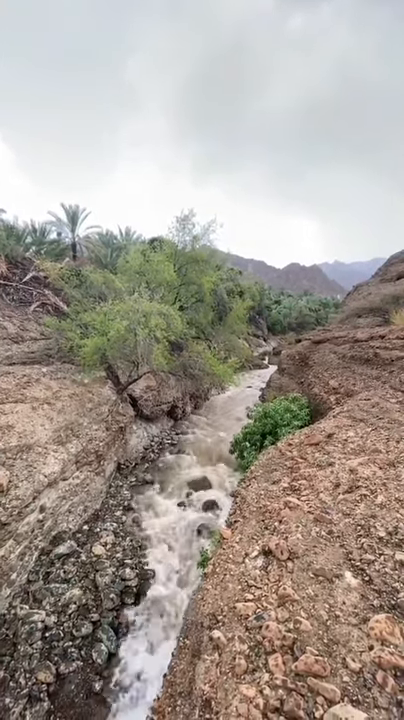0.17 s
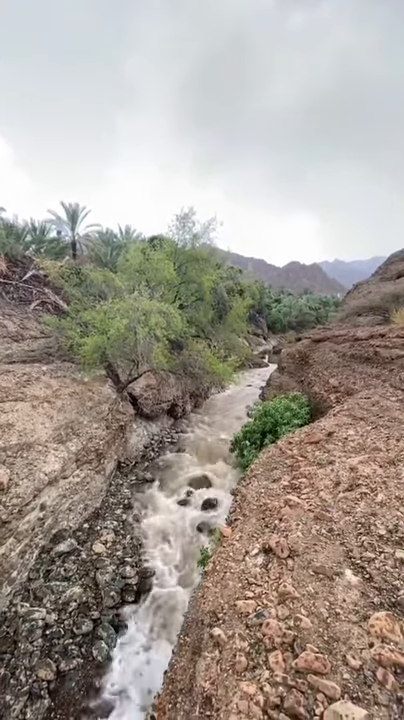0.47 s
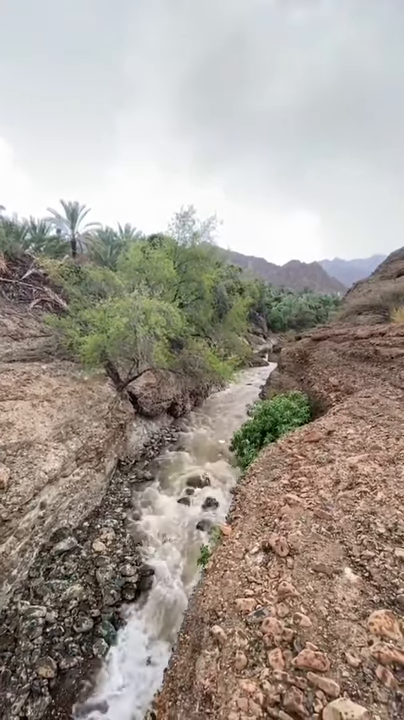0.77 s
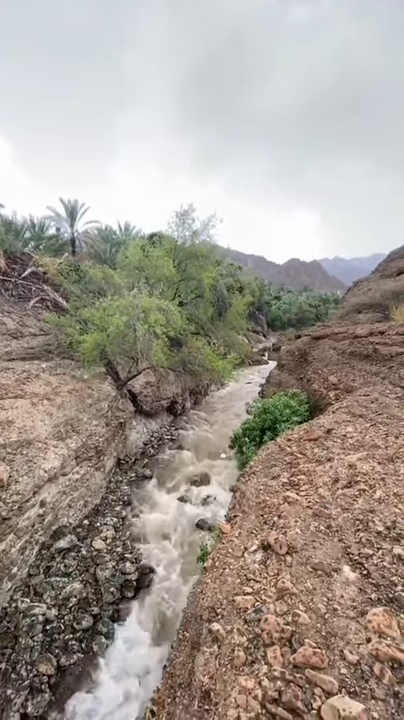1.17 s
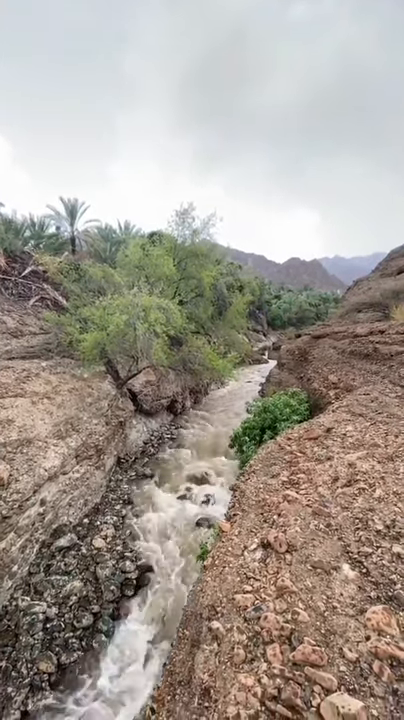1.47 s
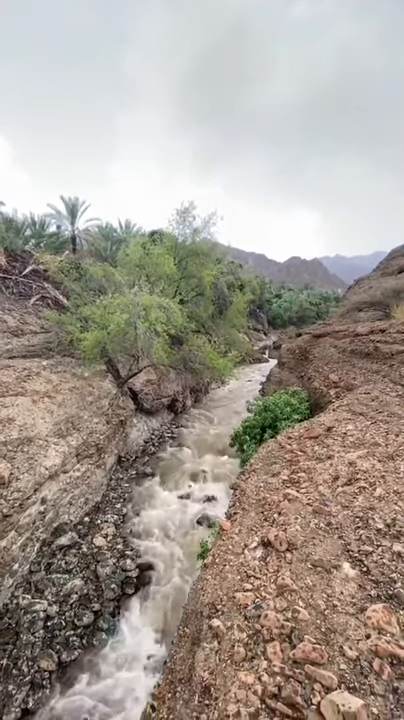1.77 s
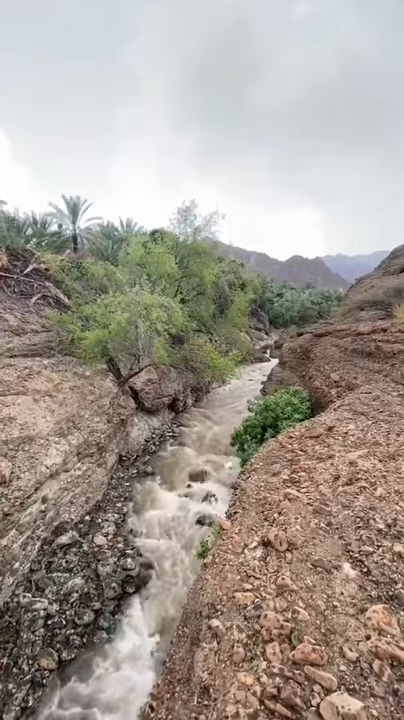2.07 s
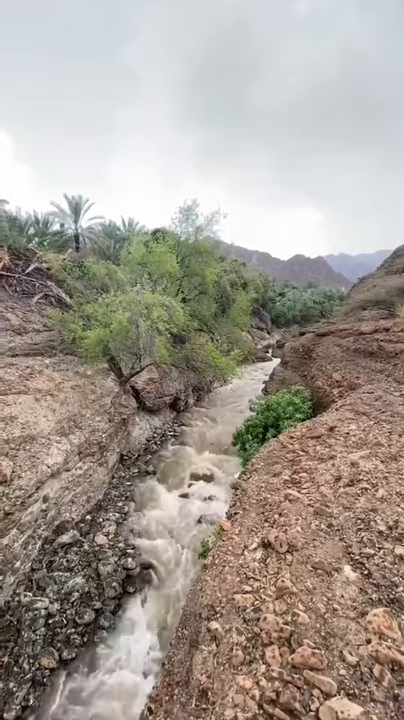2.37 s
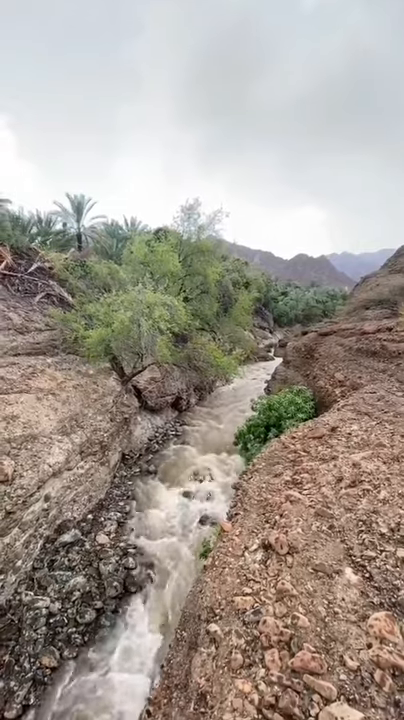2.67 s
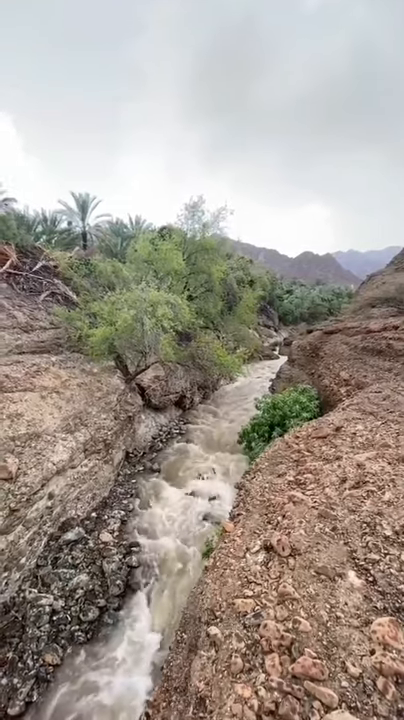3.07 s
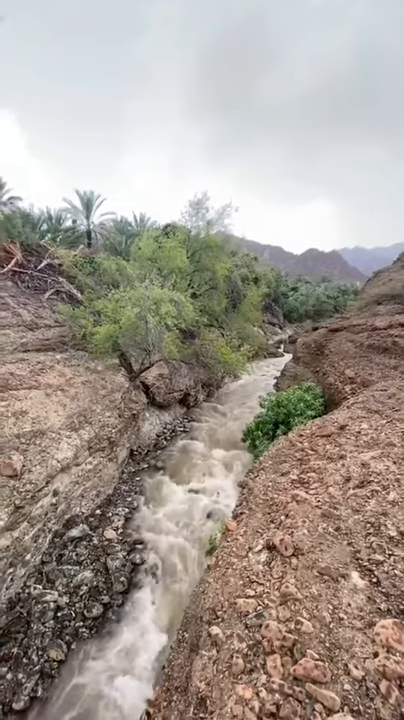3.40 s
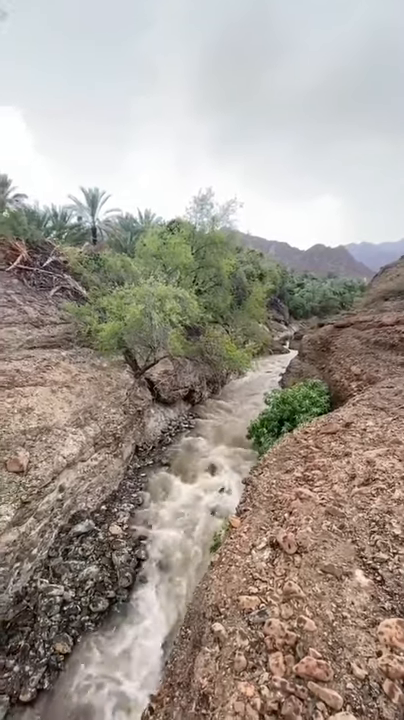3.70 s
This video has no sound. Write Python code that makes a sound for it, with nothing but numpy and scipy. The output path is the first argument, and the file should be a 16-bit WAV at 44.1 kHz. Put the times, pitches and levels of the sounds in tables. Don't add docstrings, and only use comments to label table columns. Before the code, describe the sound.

A muddy torrent rushes continuously down a rocky gully a few metres away, roaring, hissing and bubbling, swelling slightly; wind soon begins thumping and fluttering on the handheld phone microphone outdoors.

```python
import sys
import numpy as np
from scipy import signal
from scipy.fft import rfft, irfft
from scipy.io import wavfile

SR = 44100
rng = np.random.default_rng(int(sys.argv[2]) if len(sys.argv) > 2 else 0)


def level_to_linear(level):
    exponent = np.asarray(level, float) / 20
    return 10 ** exponent


def wav_record(signal):
    frames = np.transpose(np.atleast_2d(signal))
    bounded = np.clip(frames, -1, 1)
    quanta = np.round(bounded * 32767).astype(np.int16)
    wavfile.write(sys.argv[1], SR, quanta)


N = 169344

# time_s, level_db
FLOW_LEVEL = [(0, -1), (.6, -1.5), (1.2, 0), (1.9, 0.7), (2.5, 0.5), (3.1, 1.16), (3.84, 0.8)]


def evened(x):
    return x / np.sqrt(np.mean(x ** 2) + 1e-20)


def curve(points, t):
    return np.interp(t, *np.transpose(points))


def turbulence(colour, patchy_db, patch_s, patch_hz, flicker_db, flicker_s):
    size, hop = 1024, 256
    hz = np.fft.rfftfreq(size, 1 / SR)
    frames = N // hop + 5
    real, imaginary, grain = rng.standard_normal((3, frames, len(hz)))
    shared = rng.standard_normal(frames)
    t = (np.arange(frames) - frames // 2) * hop / SR
    over_time = np.exp(-0.5 * (t / patch_s) ** 2)[:, None]
    over_pitch = np.exp(-0.5 * ((hz - hz[-1] / 2) / patch_hz) ** 2)
    patches = evened(signal.fftconvolve(grain, over_time * over_pitch, "same"))
    flicker = evened(signal.fftconvolve(shared, np.exp(-0.5 * (t / flicker_s) ** 2), "same"))
    colour_hz, colour_db = np.transpose(colour)
    shape_db = np.interp(np.log(hz + 1), np.log(colour_hz), colour_db, left=-60, right=-60)
    level_db = shape_db + patchy_db * patches + flicker_db * flicker[:, None]
    spectra = (real + 1j * imaginary) * level_to_linear(level_db)
    return evened(signal.istft(spectra.T, nperseg=size, noverlap=size - hop)[1][:N])


def torrent():
    # pitch_hz, level_db_per_hz
    roar_colour = [(40, -55), (55, -10), (200, -2.5), (420, -7), (560, -7), (800, -2), (1250, -15.5),
                   (2500, -22)]
    # pitch_hz, level_db_per_hz
    spray_colour = [(1200, 0.5), (2500, -3), (4400, -3.5), (5500, -0.5), (6400, -5.5), (7600, -9.5),
                    (9800, -9.5), (12000, -15)]
    roar_db, spray_db, bubbles_db = -28.5, -32.5, -36.5
    flow_db = curve(FLOW_LEVEL, np.arange(N) / SR)
    roar = turbulence(roar_colour, patchy_db=0.17, patch_s=0.045, patch_hz=143,
                      flicker_db=-0.9, flicker_s=0.013)
    spray = turbulence(spray_colour, patchy_db=0.95, patch_s=0.015, patch_hz=255,
                       flicker_db=-0.05, flicker_s=0.097)
    low = level_to_linear(roar_db) * roar + level_to_linear(bubbles_db) * bubbles(count=24)
    return low * level_to_linear(flow_db) + level_to_linear(spray_db + 0.74 * flow_db) * spray


def bubbles(count):
    per_s, low_hz, high_hz = 700, 349.4, 2210
    cycles, rise = 6.4, 0.1464
    loudness = level_to_linear(3.7 * np.minimum(rng.exponential(1, N), 5))
    bursts = loudness * (rng.random(N) < per_s / SR)
    kind = rng.integers(0, count, N)
    t, out = np.arange(3000) / SR, np.zeros(N)
    for k, hz in enumerate(np.geomspace(low_hz, high_hz, count)):
        u = t * hz / cycles
        tone = np.sin(2 * np.pi * hz * t * (1 + rise * np.minimum(u, 3)))
        ring = u * np.exp(-3 * u) * tone
        small_is_softer = (low_hz / hz) ** 0.52
        out += signal.oaconvolve(bursts * (kind == k), ring * small_is_softer)[:N]
    return evened(out)


def gulps():
    # start_s, peak_db, pitch_hz, rise_hz_per_s, length_s
    pockets = [
        (1.2073, -15.5, 660, 22000, 0.0085),
    ]
    out, t = np.zeros(N + 2000), np.arange(2000) / SR
    for start_s, peak_db, hz, rise, length_s in pockets:
        ring = np.sin(2 * np.pi * (hz + rise * t / 2) * t)
        shape = np.minimum(t / 0.0008, 1) * np.exp(-(t / length_s) ** 3)
        out[round(start_s * SR):][:len(t)] += level_to_linear(peak_db) * shape * ring
    return out[:N]


def breeze():
    # time_s, level_db
    gusts = [(0, -36), (.5, -34), (.9, -32.5), (1.3, -28.5), (1.7, -31.5), (2.1, -30), (2.45, -29.5),
             (2.8, -29.5), (3.1, -33.5), (3.5, -32), (3.84, -31)]
    # pitch_hz, level_db_per_hz
    wind_colour = [(45, -10), (100, -0.5), (200, -6), (330, 3.5), (450, -6), (650, -26.5), (1200, -43)]
    lumps = turbulence(wind_colour, patchy_db=1.0, patch_s=0.022, patch_hz=110,
                       flicker_db=0.14, flicker_s=0.011)
    return level_to_linear(curve(gusts, np.arange(N) / SR)) * lumps


def buffets():
    # start_s, peak_db, pitch_hz, length_s
    port_eddies = [(0.823, -15.5, 377, 0.018), (1.135, -16, 315, 0.0053), (1.393, -12, 289, 0.014),
                   (1.624, -12.5, 298, 0.013), (1.996, -11.5, 374, 0.02), (2.078, -14, 386, 0.021),
                   (2.156, -16, 220, 0.022), (2.297, -19, 110, 0.064), (2.394, -6.5, 404, 0.019),
                   (2.408, -15.5, 254, 0.018), (2.586, -8.5, 296, 0.014), (2.688, -13.5, 371, 0.025),
                   (2.799, -10, 328, 0.014), (2.818, -9, 256, 0.009), (2.94, -9, 383, 0.016),
                   (3.0, -16.5, 215, 0.017), (3.192, -13.5, 425, 0.018), (3.442, -11.5, 514, 0.013),
                   (3.799, -13, 497, 0.018),
                   (1.244, -20, 310, .014), (1.47, -20, 374, .015), (1.565, -18, 337, 0.027),
                (1.626, -16, 222, 0.017), (1.724, -17.5, 290, 0.017), (1.869, -18.5, 302, 0.014),
                (2.006, -13, 217, 0.018), (2.096, -16, 298, 0.013), (2.215, -17, 269, 0.02),
                (2.265, -17, 372, 0.031), (2.439, -16, 307, 0.019), (2.51, -18.5, 383, 0.017),
                (2.58, -13.5, 209, .02), (2.663, -15, 382, 0.02), (2.746, -15, 428, 0.012),
                (2.803, -13, 149, 0.025), (3.122, -15, 417, .014), (3.372, -18, 355, 0.018),
                (3.735, -18.5, 198, 0.022)]
    trim_db, width, rise = -2, 0.35, 0.46
    eddies = port_eddies
    out, t = np.zeros(N + 4000), np.arange(4000) / SR
    side, weight = np.array([[0], [-1], [1]]), np.array([[1], [0.45], [0.45]])
    chance = rng.random((len(eddies), 6))
    for (start_s, peak_db, hz, length_s), r in zip(eddies, chance):
        u = t / length_s
        shape = np.clip(u / rise, 0, 1) * np.exp(-u ** 3)
        pitches = hz * (1 + width * side * (0.5 + 0.5 * r[:3, None]))
        wave = (weight * np.sin(2 * np.pi * (pitches * t + r[3:, None]))).sum(0)
        out[round(start_s * SR):][:len(t)] += level_to_linear(peak_db + trim_db) * shape * wave / 1.61
    return out[:N]


def scene():
    return (torrent() + gulps() + breeze() + buffets())[None]


def coarse_lines(x):
    # pitch_hz, step_db
    line_step = [(1500, -31.5), (2450, -21), (3300, -24), (5300, -23.5), (7000, -27), (8600, -28.5),
                 (10500, -34), (11850, -31.5)]
    band_wander_db, frame_wander_db, rounding = 2.0, 1.96, 0.37
    hop, lines, band = 941, 504, 8
    n, k = np.arange(2 * hop)[:, None] + 0.5, np.arange(lines) + 0.5
    window = signal.windows.kaiser_bessel_derived(2 * hop, 4 * np.pi)[:, None]
    basis = np.sqrt(2 / hop) * window * np.cos(np.pi / hop * (n + hop / 2) * k)
    padded = np.pad(x, (hop, 2 * hop))
    frames = np.lib.stride_tricks.sliding_window_view(padded, 2 * hop)[::hop]
    wander = rng.standard_normal((len(frames), lines // band + 1))
    by_band = np.repeat(wander[:, :-1], band, axis=1)
    step_hz, step_db = np.transpose(line_step)
    line_db = np.interp(np.log(k * SR / (2 * hop)), np.log(step_hz), step_db)
    flow_db = curve(FLOW_LEVEL, np.arange(len(frames)) * hop / SR)[:, None]
    step = level_to_linear(line_db + frame_wander_db * wander[:, -1:] + flow_db + band_wander_db * by_band)
    in_steps = frames @ basis / step
    rounded = np.sign(in_steps) * np.floor(abs(in_steps) + rounding) * step
    back = rounded @ basis.T
    return (back[:-1, hop:] + back[1:, :hop]).ravel()[:N]


def band_limit(x):
    return signal.sosfilt(signal.butter(12, 12150, fs=SR, output="sos"), x)


def record(dry):
    # pitch_hz, level_db
    port_response = [(2150, 0), (2470, -3), (2800, 0), (6300, 0), (7050, -8.5), (8400, -5.5), (9300, -0.5)]
    bass_cut = signal.butter(4, 44, "high", fs=SR, output="sos")
    heard = signal.sosfilt(bass_cut, dry[0])
    port_hz, port_db = np.transpose(port_response)
    gain = level_to_linear(np.interp(np.fft.rfftfreq(N, 1 / SR), port_hz, port_db))
    through_port = irfft(rfft(heard) * gain, N)
    return band_limit(coarse_lines(through_port)[None])


dry = scene()
out = record(dry)
wav_record(out)
```